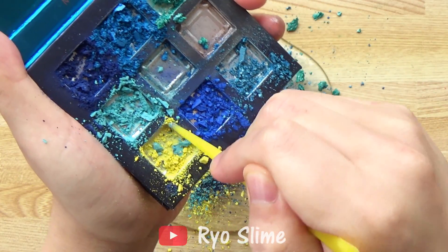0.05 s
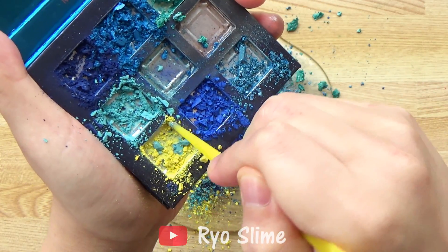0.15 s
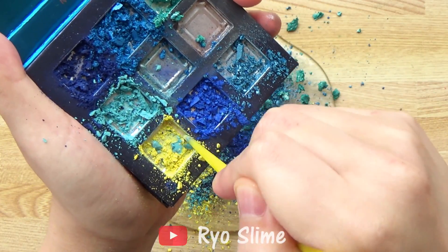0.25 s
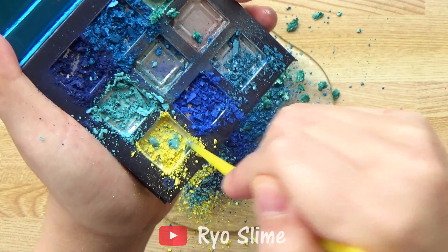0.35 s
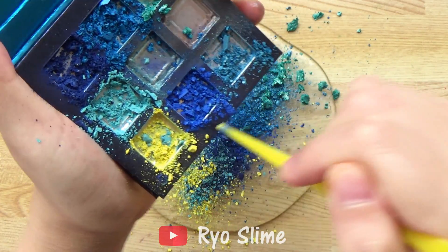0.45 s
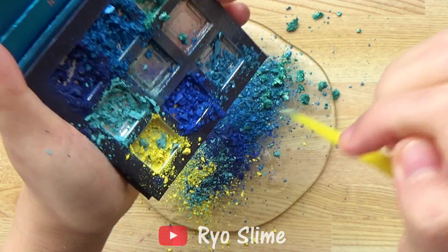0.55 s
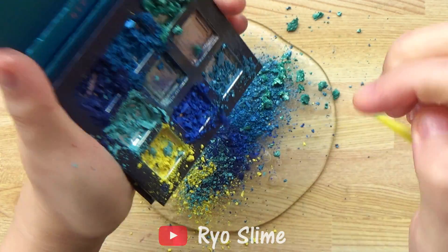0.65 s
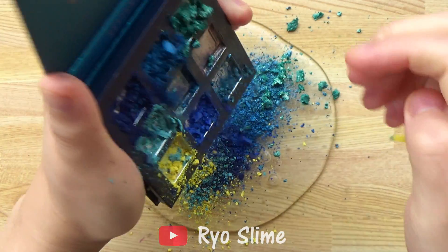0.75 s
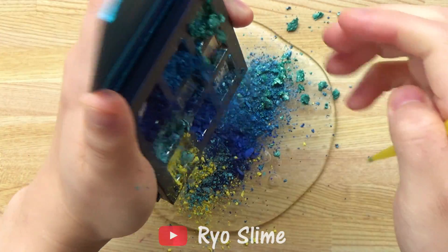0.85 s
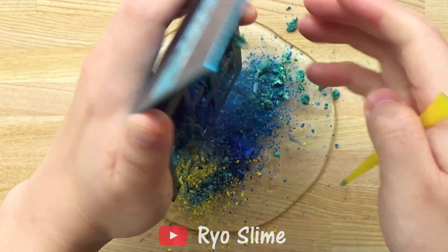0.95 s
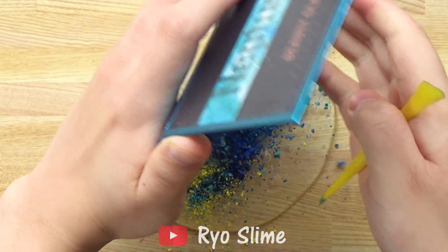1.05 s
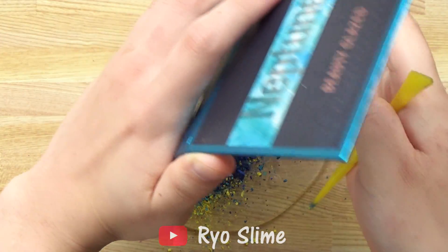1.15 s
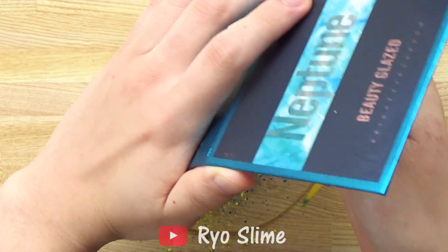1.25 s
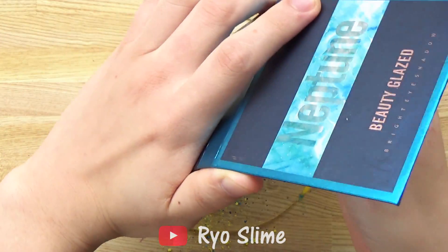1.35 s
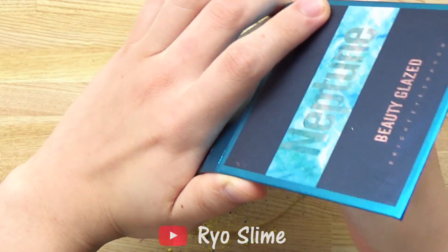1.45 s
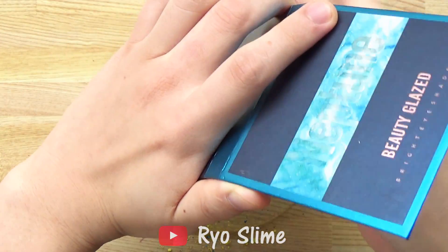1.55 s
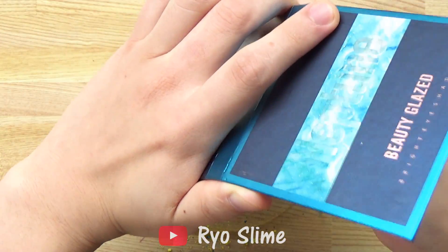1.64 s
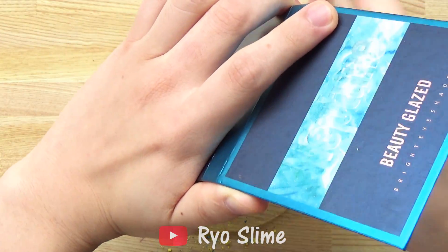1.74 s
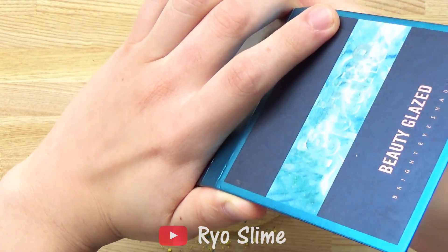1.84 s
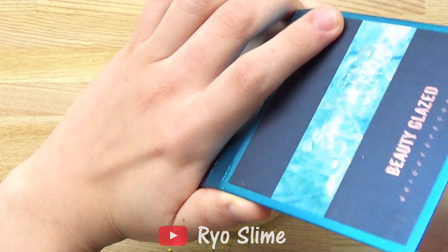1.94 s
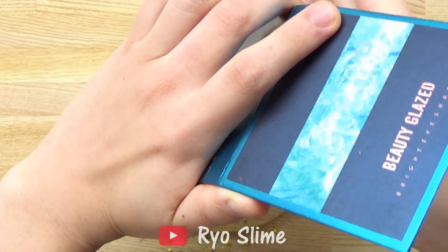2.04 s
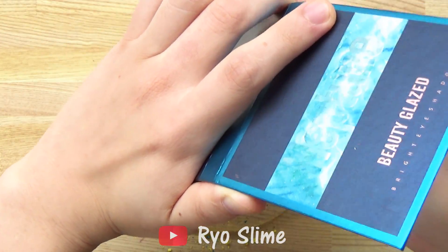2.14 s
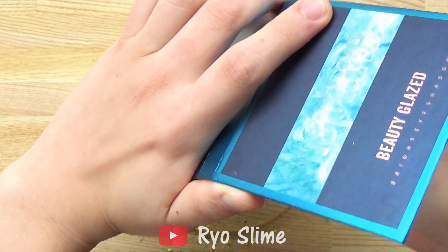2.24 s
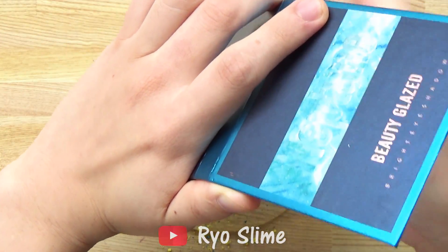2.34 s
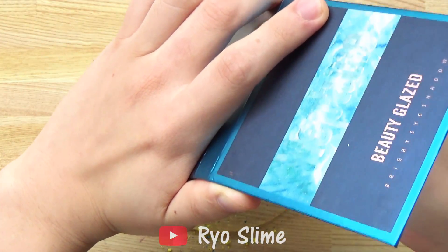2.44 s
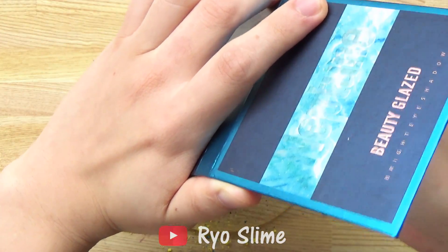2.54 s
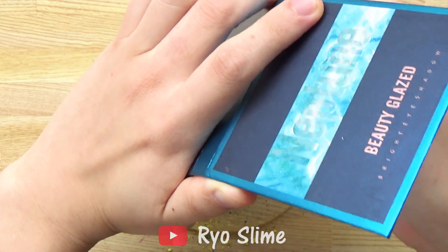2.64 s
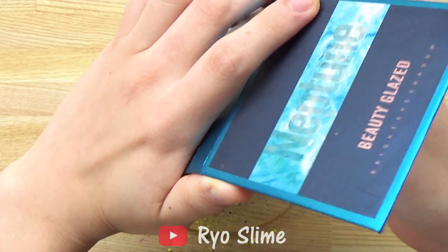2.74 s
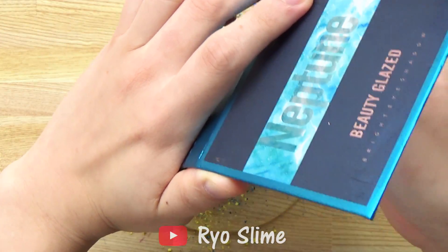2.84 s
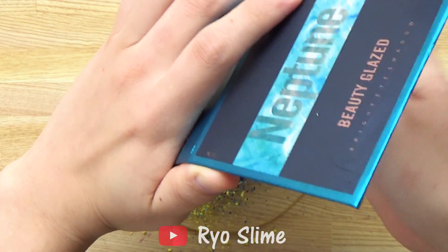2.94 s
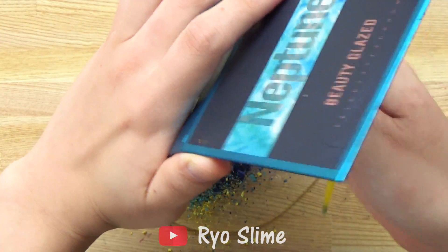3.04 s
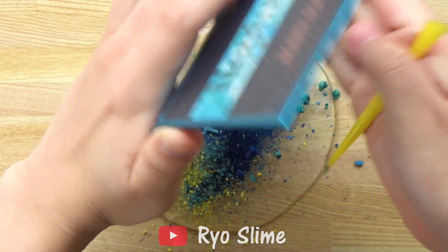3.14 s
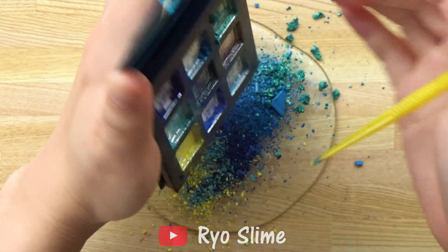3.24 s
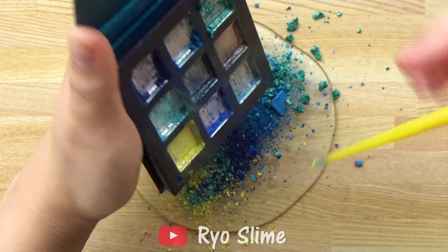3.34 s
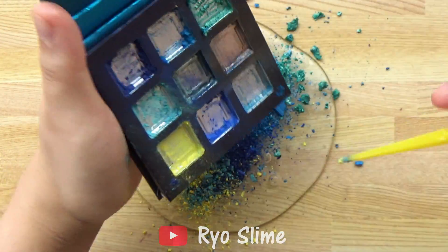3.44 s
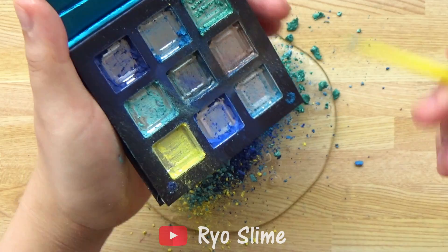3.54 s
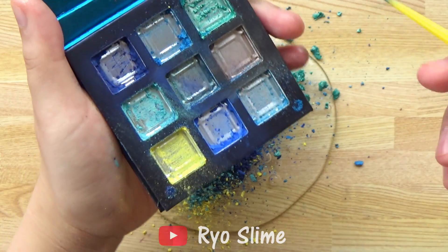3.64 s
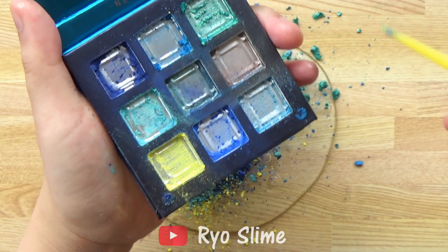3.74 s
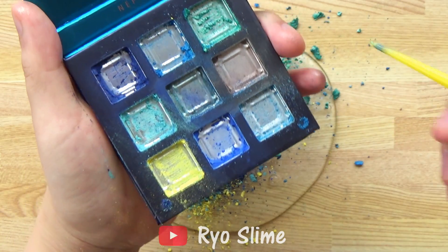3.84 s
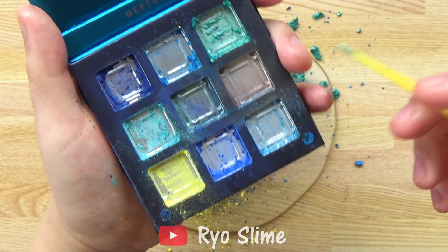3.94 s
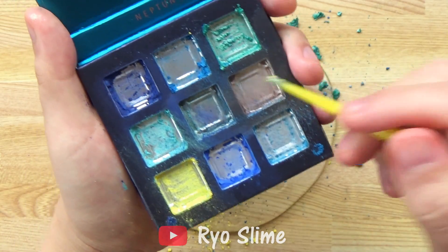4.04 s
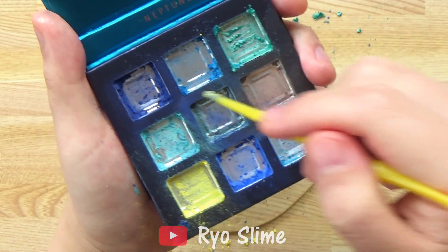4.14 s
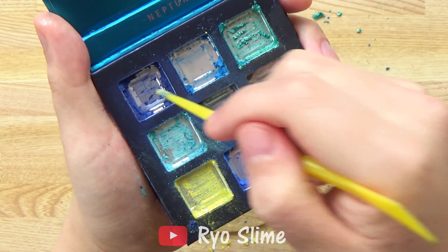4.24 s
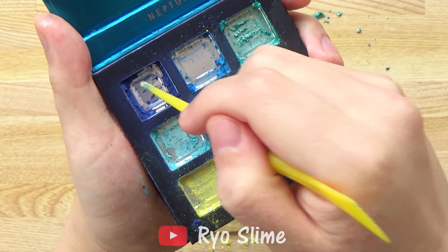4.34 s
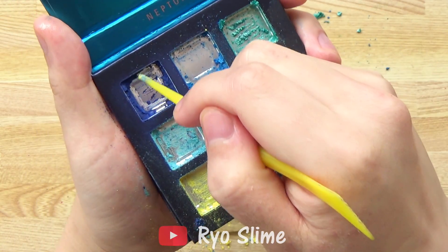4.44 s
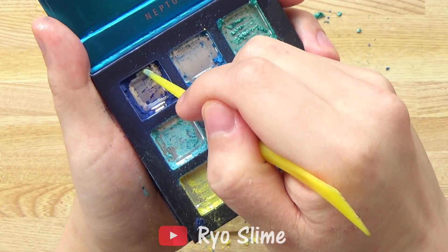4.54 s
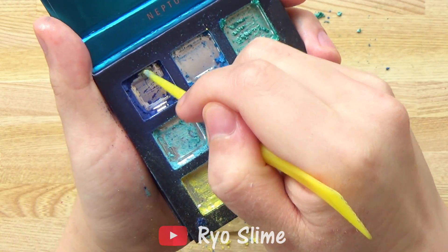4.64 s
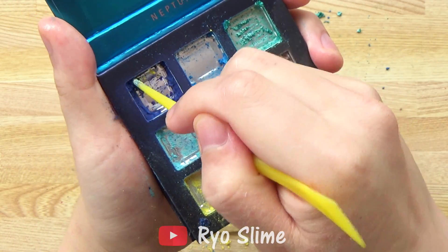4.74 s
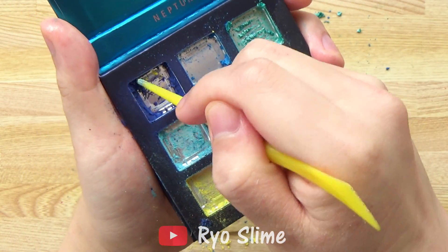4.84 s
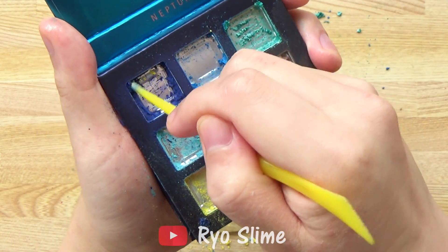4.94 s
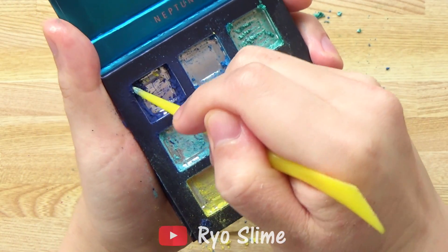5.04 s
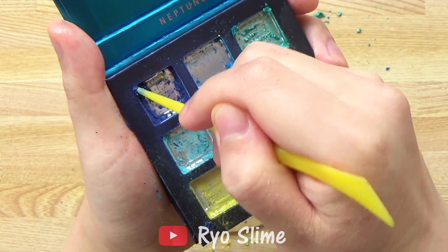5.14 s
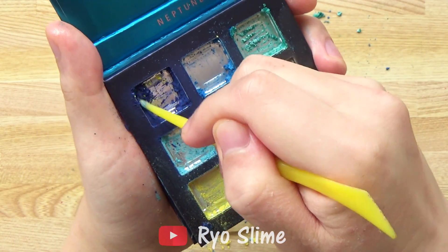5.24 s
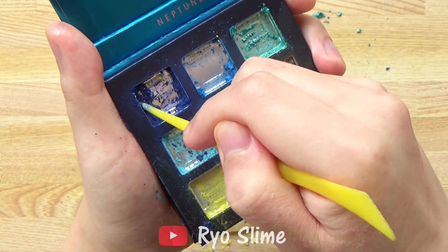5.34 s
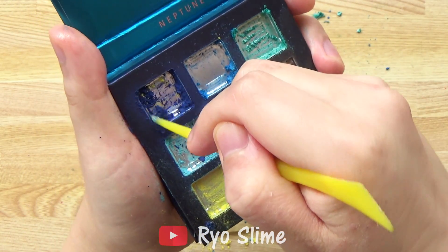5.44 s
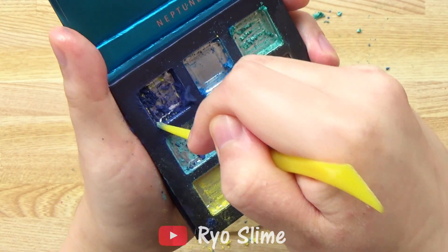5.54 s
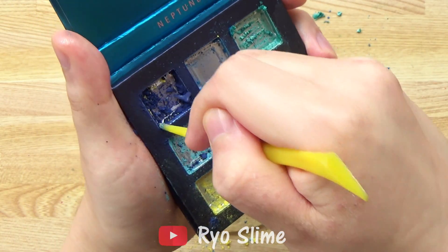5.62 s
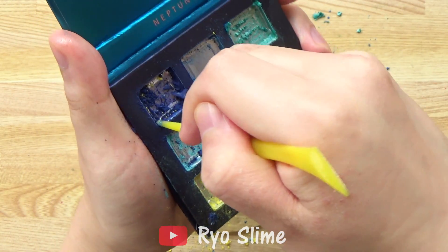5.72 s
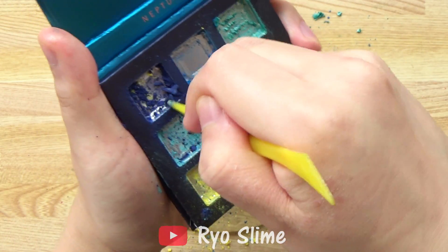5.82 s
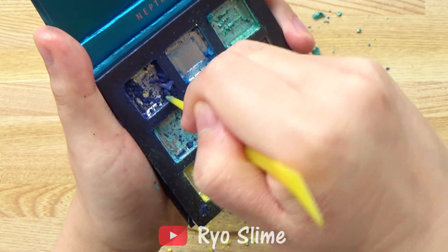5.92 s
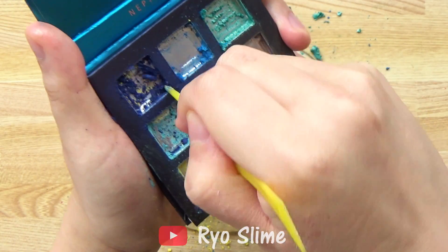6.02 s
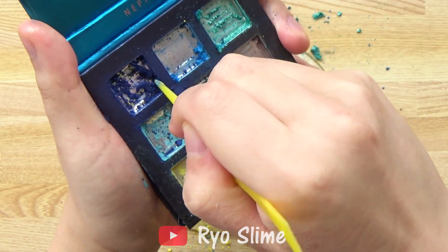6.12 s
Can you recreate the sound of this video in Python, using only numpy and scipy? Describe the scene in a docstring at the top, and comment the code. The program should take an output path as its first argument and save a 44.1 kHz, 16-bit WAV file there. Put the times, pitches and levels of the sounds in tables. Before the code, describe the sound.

Close up, gritty scraping and light ticks, a rapid run of finger slaps on a thin plastic case, then sparse digging clicks and hollow snaps.

```python
"""A hand-held plastic powder palette close to a stereo microphone in a quiet room.
First a thin pick scrapes (noise grains in resonances) and ticks (struck case modes, snaps, thumps) in the pans.
The palette is turned over and slapped: cracks, case ring, slow swings, and hiss let through by a noise gate.
Then the pick digs into the pan corners, and a pan gives way in hollow ringing jerks. Fingers rustle on the case
(patchy noise), thin whistles come and go (gliding narrow-band noise), and low noise rumbles throughout."""
import sys
import numpy as np
from scipy import signal
from scipy.io import wavfile

SR = 44100
rng = np.random.default_rng(int(sys.argv[2]) if len(sys.argv) > 2 else 0)


def output_pcm(signal):
    """Save a mono or channel-first signal as 16-bit PCM at the path in sys.argv[1].

    Samples are clipped to [-1, 1] before scaling.
    """
    pcm = np.clip(np.atleast_2d(signal).T, -1, 1) * 32767
    wavfile.write(sys.argv[1], SR, np.round(pcm).astype(np.int16))


def ratio(d):
    """dB to gain"""
    e = np.asarray(d, float) / 20
    return 10 ** e


N = 272538

# All levels in the tables are relative within their own source.
# slaps on the palette: (time [s], case level [dB], thump level [dB], rocking level [dB], gate hiss level [dB])
SLAP_EVENTS = [(1.509, -31, -20, -23, -38.5), (1.658, -33.5, -21.5, -20.5, -35),
               (1.808, -31.5, -21.5, -17, -36), (1.961, -15, -13.5, -14.5, -35),
               (2.117, -13, -14, -15, -38.5), (2.272, -10.5, -14, -15.5, -32),
               (2.43, -7.5, -13, -13.5, -40), (2.577, -9, -13.5, -17.5, -37.5), (2.732, -10, -13, -18, -33),
               (2.897, -10.5, -12.5, -16, -36), (3.054, -16, -12, -19.5, -40.5)]
# pick and fingers touching the case:
# (time [s], case level [dB], case colour [Hz], snap level [dB], thump level [dB])
TICK_EVENTS = [(.006, -33, 1900, -41, -39), (.067, -22, 540, -49, -31.5), (0.2236, -6.5, 880, -36, -35),
               (0.496, -53.5, 2500, -54, -41), (0.553, -36, 1690, -53, -56),
               (0.879, -32.5, 1690, -43.5, -49), (0.963, -10, 1500, -21.5, -44),
               (1.125, -36, 1700, -50, -56), (1.161, -51, 2500, -41, -36), (1.517, -25.5, 1640, -66, -65),
               (1.63, -49, 1700, -61.5, -59), (1.668, -32, 1630, -45, -52), (1.816, -32, 1600, -44, -54),
               (2.15, -35, 1500, -64, -56), (3.09, -40, 1500, -44.5, -40.5),
               (3.848, -34.5, 1030, -49.5, -55), (4.03, -28, 456, -54, -31),
               (4.061, -28.5, 450, -53.5, -38), (4.089, -33, 400, -57, -40),
               (4.144, -25.5, 437, -56.5, -35.5), (4.254, -24, 490, -55, -36.5),
               (4.555, -29, 590, -66, -35.5), (4.607, -22, 650, -55, -46), (4.899, -19, 750, -53, -38.5),
               (5.119, -24, 750, -61, -33.5), (5.244, -25, 640, -59.5, -37), (5.272, -29, 612, -38, -38.5),
               (5.329, -52, 2500, -31.5, -63), (5.439, -18.5, 700, -63, -44), (5.461, -22, 570, -64.5, -33),
               (5.469, -20.5, 665, -60, -44), (5.521, 0.5, 740, -29.5, -20), (5.552, -33, 1500, -51, -57),
               (5.563, -17.5, 2530, -23, -58), (5.72, -26.5, 1010, -49, -63), (5.797, 0, 880, -22, -18),
               (5.8, -22, 790, -42, -21.5), (5.835, -17.5, 1130, -33.5, -40), (6.0046, 0, 910, -28.5, -23),
               (6.111, -14.5, 800, -36.5, -56), (6.121, -16, 820, -53, -31.5)]
# a pan gives way under the pick: (time [s], level [dB])
JERK_EVENTS = [(4.677, -13), (4.6835, 1.5), (4.6937, 8), (4.698, -18), (4.707, -7.5)]
# strokes of the pick through powder and along the pans:
# (start [s], length [s], dull drag level [dB], scrape level [dB], grit level [dB])
PICK_STROKES = [(.001, 0.088, -37.5, -39.5, -41.5), (0.21, 0.12, -36, -33.5, -50),
                (0.232, 0.059, -60, -30.5, -37), (0.251, 0.099, -42, -27, -42.5),
                (0.344, 0.06, -72, -82, -101), (0.937, 0.11, -50, -40.5, -44),
                (1.112, 0.091, -70, -42, -51), (1.195, 0.067, -50, -45, -51), (3.485, 0.066, -81, -65, -71),
                (4.479, .06, -60, -85, -58), (4.545, 0.079, -49, -75, -69), (4.651, .03, -37, -58, -51),
                (4.665, 0.067, -30, -45, -38.5), (4.687, 0.17, -31, -50, -38.5),
                (4.969, 0.023, -39, -78, -85.5), (5.236, 0.11, -42, -48.5, -60),
                (5.339, 0.037, -65, -69, -62), (5.463, 0.029, -35.5, -57, -64),
                (5.522, 0.053, -35, -46, -38.5), (5.547, 0.12, -55, -55, -49),
                (5.716, 0.016, -33, -28, -62), (5.759, 0.083, -56, -53, -59.5),
                (5.8, 0.066, -29, -39, -33.5), (5.827, .12, -45.5, -43.5, -44.5),
                (5.994, 0.057, -66, -51, -45), (6.011, 0.095, -35.5, -40.5, -70),
                (6.135, 0.02, -34.5, -69, -40)]
# steady contact of skin and loose powder with the case: (time [s], rustle level [dB], rub level [dB])
HANDLING_CURVE = [(.46, -88, -70), (.48, -66, -58.5), (.57, -58, -60.5), (.74, -58.5, -59), (.82, -65, -54),
                  (1.09, -59.5, -50), (1.4, -68, -58.5), (1.456, -71.5, -57), (1.57, -56, -68),
                  (1.6, -100, -100), (3.085, -100, -100), (3.12, -70, -74), (3.174, -92, -89),
                  (3.43, -82.5, -77), (3.6, -63, -63), (3.8, -71, -68), (3.86, -65, -64.5),
                  (4.3, -69.5, -61.5), (4.65, -69, -58), (4.8, -82, -68), (5.22, -76, -71.5),
                  (5.27, -61.5, -64), (5.6, -59, -53.5), (5.7, -80, -66.5), (6.18, -72.5, -55)]
# fingers slide briefly on the case: (middle [s], half length [s], rustle level [dB], rub level [dB])
FINGER_SWISHES = [(1.001, 0.019, -49, -67), (1.237, .04, -53, -68), (1.338, 0.043, -50.5, -59),
                  (1.526, .025, -39, -51), (3.293, 0.039, -63, -80), (3.396, 0.016, -66, -61.5),
                  (3.495, 0.04, -56, -64), (4.98, 0.0068, -67, -95), (5.273, 0.029, -50, -58),
                  (5.336, 0.013, -42.5, -68), (5.479, .015, -51, -66)]
# faint thin whistles: (middle [s], half length [s], frequency [Hz], rise [Hz/s], level [dB])
WHISTLES = [(1.284, .12, 4490, 1200, -52.5), (1.486, .03, 4700, 500, -56), (4.323, 0.093, 4600, 302, -61.5),
            (4.537, 0.081, 3840, -500, -64)]
# low rumble of hands and table: (time [s], level [dB])
RUMBLE_CURVE = [(0.0, -33.5), (0.34, -33.5), (1.19, -29), (1.46, -27.5), (1.7, -41), (2.56, -35.5),
                (2.96, -32), (3.25, -40.5), (3.84, -37.5), (4.18, -35.5), (4.56, -30), (4.96, -33),
                (5.09, -32), (5.59, -36), (6.18, -34.5)]

# modes of the plastic case: (frequency [Hz], level [dB], t60 [s])
CASE_MODES = [(292, 5.5, 0.0057), (400, 8.5, 0.0094), (640, -9.5, 0.039), (751, 4.5, 0.014),
              (1015, -29, 0.016), (1173, 7, 0.0098), (1500, 5.5, 0.011), (1840, 13, 0.012),
              (2540, 1.5, 0.0047), (3070, 5, 0.028), (4500, -21.5, .01)]
# modes of the loose pan in its well: (frequency [Hz], level [dB], free t60 [s])
HOLLOW_MODES = [(487, 0, 0.22), (586, -1, 0.226), (786, 3.5, 0.11), (820, -13, 0.11), (963, -6.5, 0.04),
                (1033, 1.5, 0.057), (1305, -8, 0.026), (1765, -7.5, 0.015), (2605, -16.5, 0.029)]
# slow swings of case, hand and table after a blow:
# (frequency [Hz], t60 [s], level alike in both channels [dB], level opposed in the channels [dB])
SWING_MODES = [(25.4, 0.28, -37, -3.5), (43.7, 0.086, -36, 13), (72.3, 0.044, 2.5, -21.5),
               (124, 0.023, -5.5, -21.5), (204.5, 0.023, -7.5, -35.5)]
# bright burst of a slap: (frequency [Hz], width [Hz], level [dB])
CRACK_PEAKS = [(2780, 790, -5), (4600, 930, -7), (6570, 2080, -6), (7540, 720, 3), (9130, 1360, 0),
               (12800, 2800, -8.5), (12900, 710, -3.5)]
# bright burst of a pick contact: (frequency [Hz], width [Hz], level [dB])
SNAP_PEAKS = [(2500, 340, 0), (3960, 3900, -4.5), (6250, 1300, 0.5), (8030, 480, -0.5), (10400, 860, -9.5),
              (13300, 1700, -20.5)]
# rubbing resonances, dull: (frequency [Hz], width [Hz], level [dB])
DRAG_PEAKS = [(492, 177, 4), (750, 358, 5.5), (970, 262, 4.5), (1360, 130, -3)]
# rubbing resonances, middle: (frequency [Hz], width [Hz], level [dB])
SCRAPE_PEAKS = [(1683, 490, 6.5), (2460, 1080, 1), (2980, 520, 2)]
# rubbing resonances, bright: (frequency [Hz], width [Hz], level [dB])
GRIT_PEAKS = [(3900, 1560, 0), (4600, 760, 3.5), (5150, 1480, -7)]
# spectral density of the gate hiss: (frequency [Hz], level per Hz [dB])
GATE_HISS_SPECTRUM = [(150, 5), (250, 7.5), (368, -1), (754, -13.5), (931, -22), (1170, 6.5), (1980, -32.5),
                      (2360, -32), (3010, -15), (3470, -41.5), (8630, -4.5), (13800, -23.5), (15700, -33),
                      (16500, -62)]
# spectral density of the rustle: (frequency [Hz], level per Hz [dB])
RUSTLE_SPECTRUM = [(3240, -30), (5500, -26), (7450, -4), (13400, -9.5), (15800, -10), (16300, -18),
                   (16500, -51)]
# spectral density of the rumble: (frequency [Hz], level per Hz [dB])
RUMBLE_SPECTRUM = [(12, -67), (20, 8), (118, -4.5), (157, -14), (282, -12), (352, -22), (987, -30.5),
                   (1310, -37.5), (1880, -47), (2500, -53), (3250, -55), (5500, -120)]
# left-right correlation of banded noise: (frequency [Hz], correlation [1])
STEREO_LIKENESS = [(60, 0.039), (240, 0.29), (950, 0.15), (3770, 0.66), (15000, 0.061)]

SLAP_COLOUR_HZ, CRACK_DB, CRACK_FOLLOWS = 824, -7.5, 0.98   # last: crack dB per case dB
GATE_HOLD_S, GATE_T60_S = 0.041, 0.16
TICK_LEFT_DB, TICK_SCATTER_DB = 0.5, 5   # level of left over right: mean and spread
FAINT_TICKS_PER_S, FAINT_TICK_DB = 6, 4   # the level is the least excess over the rub
BOUNCE_S, BOUNCE_DB, BOUNCE_BRIGHTER = 0.001826, -13, 1.95   # delay, level and colour against the tick
DIP_HZ, DIP_T60_S, DIP_DB, DIP_LEAD_S = 146, 0.017, 13, 0.0016
STROKE_ATTACK_S, STROKE_FADE_DB, FADE_BEND, LIFT_DB_PER_S = 0.0074, 27, 1.91, 613
CRUMB_DB = -13.5   # powder rustle under a stroke, against its grit
SKIN_DRAG_DB, SKIN_DRAG_FOLLOWS, SKIN_GRIT_DB = -25.5, 0.6, -8.5   # the rub also sounds dull and gritty
ROOM_T60_S, ROOM_DB = 0.2, -23


def slaps():
    """Impact excitation: two finger blows strike and heave the case; gated hiss sounds with them."""
    s, case_db, thump_db, rock_db, hiss_db = np.transpose(SLAP_EVENTS)
    centre = np.zeros(len(s))
    later = s + 0.00418 + 0.0014 * rng.standard_normal(len(s))   # the second finger
    colour_hz = centre + SLAP_COLOUR_HZ
    crack_db = CRACK_DB + CRACK_FOLLOWS * case_db
    first = case(s + 0.00096, case_db, colour_hz, centre - 3.0, focus_db=6.0)
    first = first + crack(s, crack_db, centre + 1.5, 0.011, CRACK_PEAKS, 1.4)
    second = case(later, case_db, 0.28 * colour_hz, centre - 3.0, focus_db=2.5)
    second = second + crack(later, crack_db - 27.5, centre - 4.0, 0.018, CRACK_PEAKS, 4.3)
    swing = thump(s, thump_db, rock_db - 4.5, tilt_db=-1.2)
    return first + second + swing + approach(s, rock_db) + gate_hiss(s, hiss_db)


def case(s, db, colour_hz, left_db, focus_db):
    """Modal excitation: each blow rings most the modes nearest its colour, with new strengths."""
    scatter_db = 3.0 * rng.standard_normal((len(s), len(CASE_MODES)))
    out = 0
    for k, (hz, level_db, t60) in enumerate(CASE_MODES):
        detuning_db = focus_db * np.log2(hz / colour_hz) ** 2
        sizes = ratio(db + level_db - 5.68 + scatter_db[:, k] - detuning_db)
        blows = soften(np.array([clicks(s, sizes * side) for side in pan(left_db)]), 1.4 * hz)
        out = out + (-1) ** (k // 2) * ring(blows, hz, t60)   # pairs of modes start in opposite directions
    return out


def crack(s, db, left_db, t60, peaks, own_share):
    """Burst excitation: decaying noise drives bright resonances, partly its own in each channel."""
    fall = ratio(-60 / (t60 * SR))
    starts = [clicks(s, ratio(db + 13) * side) for side in pan(left_db)]
    envelope = signal.lfilter([1], [1, -fall], starts)
    shared, own = rng.standard_normal(N), rng.standard_normal((2, N))
    return resonances(envelope * (shared + own_share * own), peaks)


def thump(s, both_db, opposed_db, tilt_db):
    """Low-frequency modes: a push sets swings alike or opposed in the channels; tilt_db is per octave."""
    starts = [clicks(s, ratio(both_db + 7.5)), clicks(s, ratio(opposed_db + 8.5))]
    push = signal.lfilter([.05], [1, -.95], starts)
    mid, side = 0, 0
    for hz, t60, mid_db, side_db in SWING_MODES:
        mid = mid + ratio(mid_db + tilt_db * np.log2(hz / 90)) * ring(push[0], hz, t60)
        side = side + ratio(side_db) * ring(push[1], hz, t60)
    return np.array([mid + side, mid - side])


def approach(s, db):
    """Air displacement by the swinging hand: a heave alike in both channels, a growing push opposed."""
    out = np.zeros((2, N))
    u = np.arange(round(.11 * SR)) / round(.11 * SR)   # progress from 0 to 1
    heave = ratio(-5.5) * np.sin(2 * np.pi * u ** 1.4) * np.sin(np.pi * u) ** .4
    push = ratio(0.3) * u ** 1.5
    for end, level_db in zip(s, db):
        i = round(end * SR)
        out[:, i - len(u):i] += ratio(level_db) * np.array([heave + push, heave - push])
    return soften(out, 130)


def gate_hiss(s, db):
    """Noise gating: hiss let through by a noise gate that opens at each slap, holds briefly, then fades."""
    gate, t = np.zeros(N), np.arange(round(.3 * SR)) / SR
    closing = ratio(-60 * np.maximum(t - GATE_HOLD_S, 0) / GATE_T60_S)
    shape = closing * np.minimum(t / 0.003, 1)
    for start, level_db in zip(s, db):
        i = round(start * SR)
        gate[i:i + len(t)] += ratio(level_db) * shape
    return gate * banded(GATE_HISS_SPECTRUM, grains(2700, 1.0, (2, 2, N)), patchy_db=1.2)


def ticks():
    """Hard-contact impacts: snap, case modes, a lighter brighter bounce, a dip and a thump."""
    s, case_db, colour_hz, snap_db, thump_db = np.transpose(np.vstack([TICK_EVENTS, faint_ticks()]))
    left_db = TICK_LEFT_DB + TICK_SCATTER_DB * rng.standard_normal(len(s))
    snap = crack(s, snap_db, left_db, 0.011, SNAP_PEAKS, 0.8)
    bounce_hz = np.minimum(BOUNCE_BRIGHTER * colour_hz, 2600)
    body = case(np.r_[s, s + BOUNCE_S], np.r_[case_db, case_db + BOUNCE_DB],
                np.r_[colour_hz, bounce_hz], np.r_[left_db, left_db], focus_db=13.5)
    # the case dips away as the contact loads it
    load = soften(clicks(np.maximum(s - DIP_LEAD_S, 0), ratio(thump_db + DIP_DB)), 600)
    dip = ring(load, DIP_HZ, DIP_T60_S)
    return body + snap - dip + thump(s + 0.0028, thump_db - 1.5, thump_db - 21.5, tilt_db=8.0)


def faint_ticks():
    """Random impacts of shifting fingers, their level following the rub; rows like TICK_EVENTS."""
    at, pitch, size = rng.random((round(FAINT_TICKS_PER_S * N / SR), 3)).T
    s = at * (N - 400) / SR
    rub_db = np.interp(s, *np.transpose(HANDLING_CURVE)[[0, 2]])
    db = rub_db + FAINT_TICK_DB + 12 * size
    return np.transpose([s, db, 500 * 5.0 ** pitch, db - 31.5, db + 1.5])


def jerks():
    """Modal damping: hollow modes mostly damped by the pick, a weaker part rings free; a little crunch."""
    s, db = np.transpose(JERK_EVENTS)
    scatter_db = 2.5 * rng.standard_normal((len(s), len(HOLLOW_MODES)))
    out = 0
    for k, (hz, level_db, free_t60) in enumerate(HOLLOW_MODES):
        push = clicks(s, (-1) ** k * ratio(db + level_db - 14.0 + scatter_db[:, k]))
        out = out + ring(push, hz, 0.03) + ratio(-14.5) * ring(push, hz, free_t60)
    crunch = crack(s, db - 40.0, 0 * s, 0.03, SNAP_PEAKS, 1.0)
    return soften(out, 4400) * pan([-1.0]) + crunch


def rubbing():
    """Friction excitation: pick strokes and skin on the case drive the same crumbly resonances."""
    drag, scrape, grit = strokes()
    rustling, rub = handling()
    crumbs = rustling + ratio(CRUMB_DB) * grit
    drag = drag + ratio(SKIN_DRAG_DB + 1.1 * drift(5)) * rub ** SKIN_DRAG_FOLLOWS
    scrape = scrape + ratio(0.79 * drift(14)) * rub
    grit = grit + ratio(SKIN_GRIT_DB + 2.3 * drift(12)) * rub
    pick = drag * gritty(DRAG_PEAKS, 0.25)
    pick = pick + scrape * gritty(SCRAPE_PEAKS, 0.92) + grit * gritty(GRIT_PEAKS, 1.0)
    rustle = banded(RUSTLE_SPECTRUM, grains(2000, 3.0, (2, 2, N)), patchy_db=1.2)
    return pick * pan([-2.5]) + crumbs * rustle


def strokes():
    """Amplitude envelopes of friction: a quick bite, a fade, a lift-off; gains of drag, scrape, grit."""
    out, t = np.zeros((3, N + SR)), np.arange(SR // 2) / SR
    for start, length, *db in PICK_STROKES:
        fade_db = STROKE_FADE_DB * np.minimum(t / length, 1) ** FADE_BEND
        fade_db = fade_db + LIFT_DB_PER_S * np.maximum(t - length, 0)
        i = round(start * SR)
        shape = ratio(-fade_db) * np.minimum(t / STROKE_ATTACK_S, 1)
        out[:, i:i + len(t)] += ratio(np.array(db))[:, None] * shape
    return out[:, :N]


def handling():
    """Amplitude envelopes of sliding contact, steady plus swishes: gains of rustle and rub."""
    out = ratio(np.array(in_time(HANDLING_CURVE)))
    for middle, half, *db in FINGER_SWISHES:
        i, _, gain = swell(middle, half)
        out[:, i] += ratio(np.array(db))[:, None] * gain
    return out


def gritty(peaks, own_share):
    """Granular excitation: uneven crumbs ring resonances, wide then narrow, partly alike in the channels."""
    shared, own = grains(1200, 3.0, N), grains(1200, 3.0, (2, N))
    wide = resonances(shared + own_share * own, [(hz, 4.08 * width, 0) for hz, width, _ in peaks])
    return rms_one(resonances(wide, peaks)) * ratio(1.75 * drift(41))


def whistle():
    """Narrow-band noise: a random envelope on each gliding carrier, swelling and fading."""
    out, broken = np.zeros(N), drift(25)
    wobble = drift(260) + 1j * drift(224)
    for middle, half, hz, rise, db in WHISTLES:
        i, t, gain = swell(middle, half)
        carrier = np.exp(2j * np.pi * (hz + rise * t / 2) * t)
        out[i] += ratio(db + 1.7 * broken[i]) * gain * (wobble[i] * carrier).real
    return out


def rumble():
    """Low-frequency random noise in fluctuating bands, stronger on the right."""
    db, = in_time(RUMBLE_CURVE)
    noise = banded(RUMBLE_SPECTRUM, rng.standard_normal((2, 2, N)), patchy_db=1.0)
    return ratio(db) * noise * pan([-2.5])


def room(x):
    """Reverberation: convolution with a dull, exponentially decaying wash after a short gap."""
    t = np.arange(round(.4 * SR)) / SR
    onset = np.clip((t - .008) / 0.026, 0, 1)
    wash = rng.standard_normal((2, len(t))) * ratio(-60 * t / ROOM_T60_S) * onset
    wash = signal.sosfilt(signal.butter(1, [300, 5000], "band", fs=SR, output="sos"), wash)
    wash = wash / np.sqrt(np.sum(wash ** 2) / 2)
    return ratio(ROOM_DB) * signal.fftconvolve(x, wash, axes=1)[:, :N]


def banded(spectrum, white, patchy_db):
    """Band-filtered noise: half-octaves, each with its level, flicker and correlation; rms 1."""
    out, together = 0, drift(7.8)
    lowest = spectrum[0][0]
    edges = lowest * 2 ** np.arange(0, np.log2(18000 / lowest), .5)
    for k, (low, high) in enumerate(zip(edges, edges[1:])):
        hz = np.sqrt(low * high)
        if hz > spectrum[-1][0]:
            break
        band = signal.butter(2, [low, high], "band", fs=SR, output="sos")
        mid, side = signal.sosfilt(band, white[k % 2])   # neighbouring bands take different noise
        alike = np.clip(at_hz(STEREO_LIKENESS, hz), -1, 1)
        gain = ratio(at_hz(spectrum, hz) + patchy_db * (0.9 * together + drift(8)))
        out = out + gain * (np.sqrt(1 + alike) * mid + np.sqrt(1 - alike) * side * [[1], [-1]])
    return rms_one(out)


def grains(per_s, spread_db, size):
    """Shot noise: random clicks of uneven size on a bed of white noise."""
    sizes = ratio(spread_db * np.minimum(rng.exponential(1, size), 5))
    sizes = sizes * (rng.random(size) < per_s / SR)
    return rms_one(sizes * rng.standard_normal(size)) + 1.1 * rng.standard_normal(size)


def ring(x, hz, t60):
    """Damped oscillator: a unit click sets ringing a decaying sine of initial height 1."""
    r, w = ratio(-60 / (t60 * SR)), 2 * np.pi * hz / SR
    return signal.lfilter([0, np.sin(w)], [1, -2 * r * np.cos(w), r * r], x + 1e-18)


def resonances(x, peaks):
    """Superposition of parallel resonances of alternating sign."""
    out = 0
    for k, (hz, width, db) in enumerate(peaks):
        r = np.exp(-np.pi * width / SR)
        b = (-1) ** k * ratio(db) * (1 - r * r) / 2 * np.array([1, 0, -1])
        out = out + signal.lfilter(b, [1, -2 * r * np.cos(2 * np.pi * hz / SR), r * r], x)
    return out


def soften(x, hz):
    """Finite contact time weakens the treble: two one-pole low-passes."""
    r = np.exp(-2 * np.pi * hz / SR)
    return signal.lfilter([(1 - r) ** 2], [1, -2 * r, r * r], x)


def clicks(s, sizes):
    """Impulses of given size at each time."""
    out = np.zeros(N)
    np.add.at(out, np.round(np.asarray(s) * SR).astype(int), sizes)
    return out


def drift(rate_hz):
    """Low-passed random fluctuation of spread 1, computed at every 40th sample."""
    r = np.exp(-80 * np.pi * rate_hz / SR)
    slow = signal.lfilter([1], [1, -2 * r, r * r], rng.standard_normal(N // 40 + 2002))
    slow = slow[2000:]   # skip the filter's start
    return np.interp(np.arange(N) / 40, np.arange(len(slow)), rms_one(slow))


def swell(middle, half):
    """Gaussian envelope: its samples, their times from the middle, its gain (1/e after half)."""
    i = np.arange(round((middle - 3 * half) * SR), round((middle + 3 * half) * SR))
    t = i / SR - middle
    return i, t, np.exp(-(t / half) ** 2)


def pan(db):
    """Interchannel level difference: gains of left and right, left stronger by db."""
    return ratio(np.multiply.outer([.5, -.5], db))


def in_time(rows):
    """Linear interpolation in time: the columns of a curve, one value a sample."""
    s, *columns = np.transpose(rows)
    return [np.interp(np.arange(N) / SR, s, column) for column in columns]


def at_hz(points, hz):
    """Interpolation of a spectrum on a log-frequency axis."""
    point_hz, values = np.transpose(points)
    return np.interp(np.log(hz), np.log(point_hz), values)


def rms_one(x):
    """Normalisation to an rms of 1."""
    return x / np.sqrt(np.mean(x ** 2) + 1e-20)


def scene():
    """Superposition of all sources; the contacts also reverberate in the room."""
    contacts = slaps() + ticks() + jerks()
    return contacts + room(contacts) + rubbing() + whistle() + rumble()


def low_pass(x):
    """Removes everything above the highest recorded frequency."""
    return signal.sosfilt(signal.butter(12, 17030, fs=SR, output="sos"), x)


def record(dry):
    """Microphone response: a high-pass drops the lowest bass, and saturation rounds the peaks."""
    dry = signal.sosfilt(signal.butter(1, 8, "high", fs=SR, output="sos"), dry)
    rounded = .98 * np.tanh(dry / .98)
    return low_pass(rounded)


dry = scene()
out = record(dry)
output_pcm(out)
```